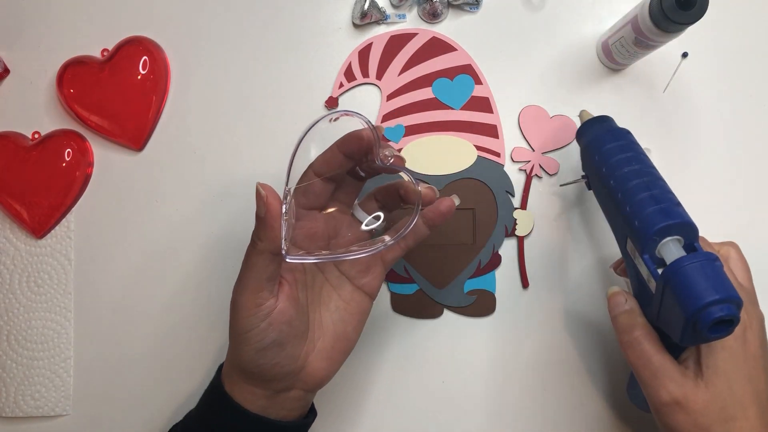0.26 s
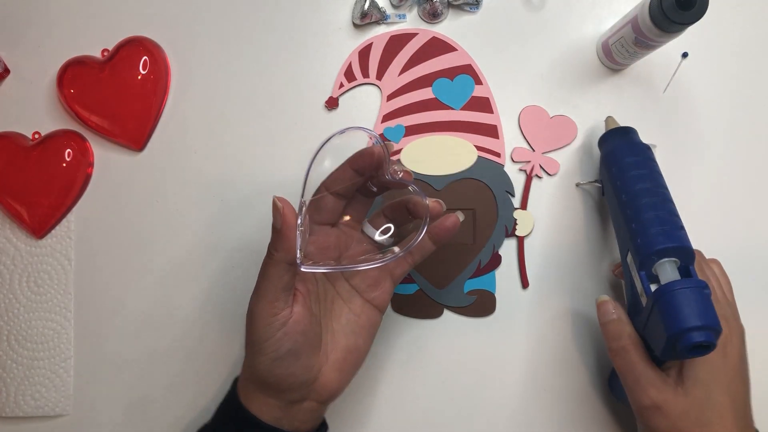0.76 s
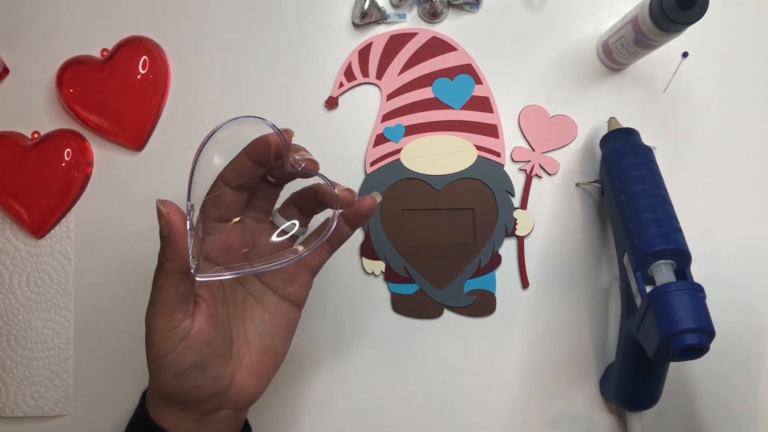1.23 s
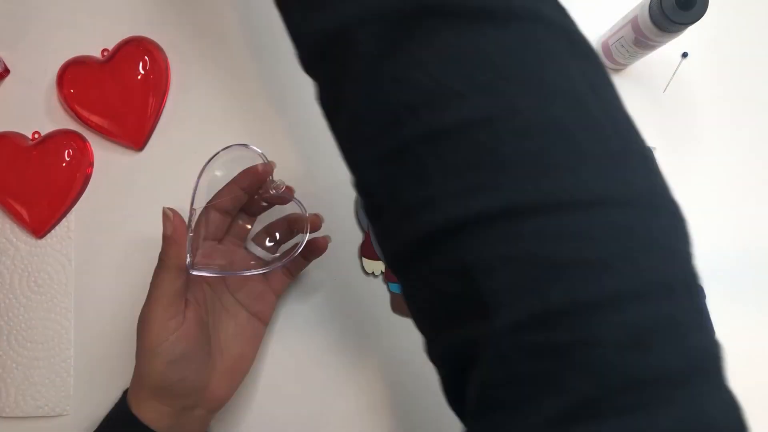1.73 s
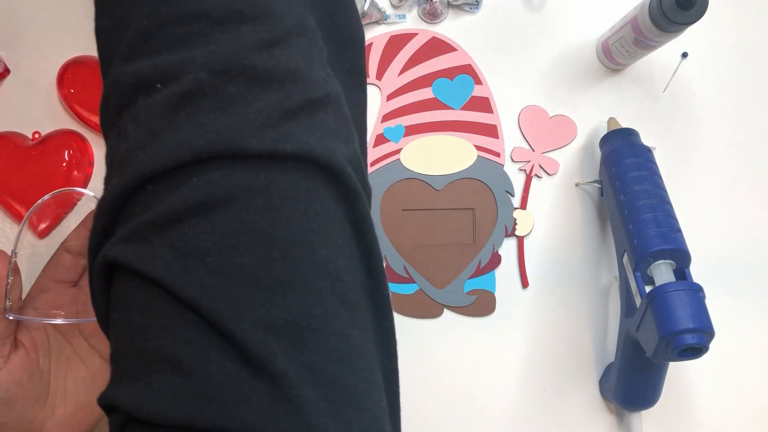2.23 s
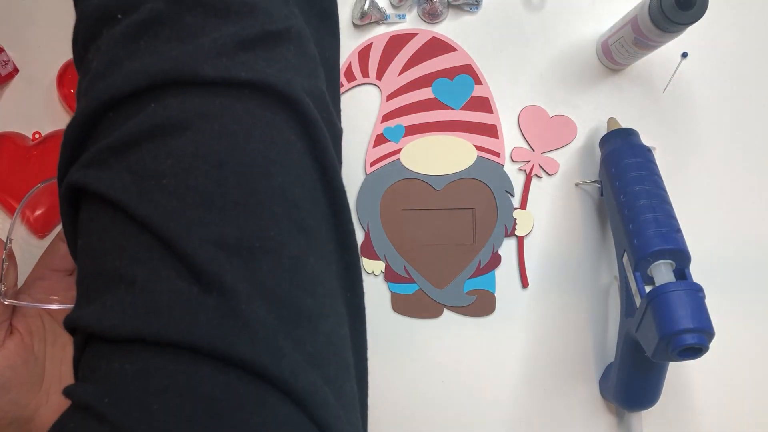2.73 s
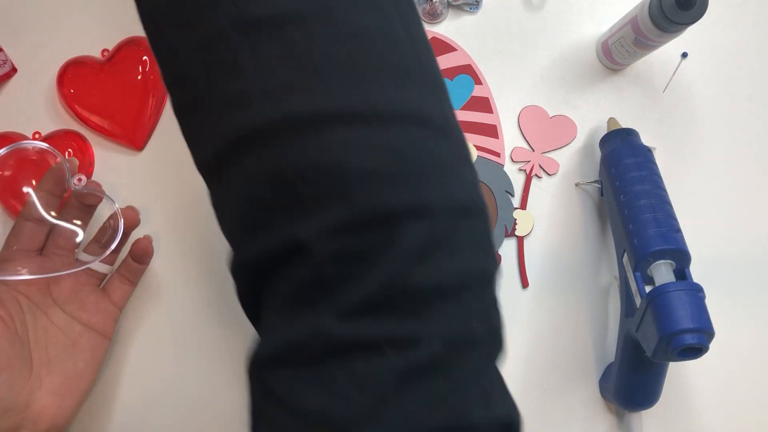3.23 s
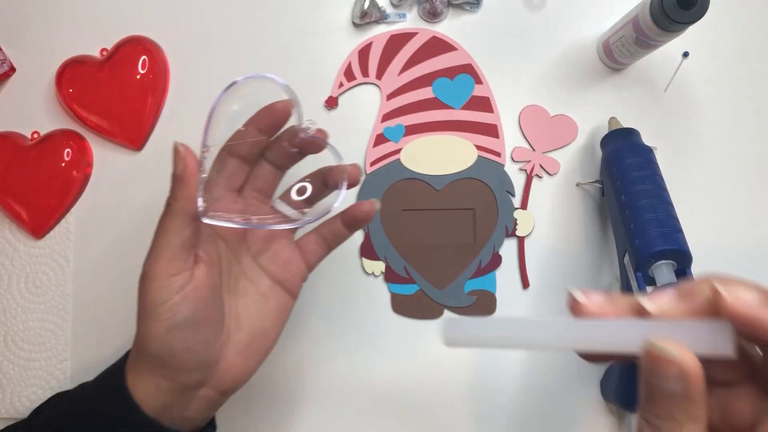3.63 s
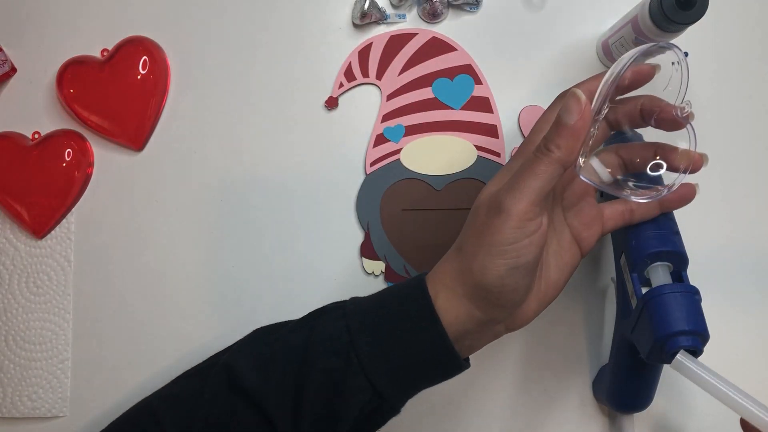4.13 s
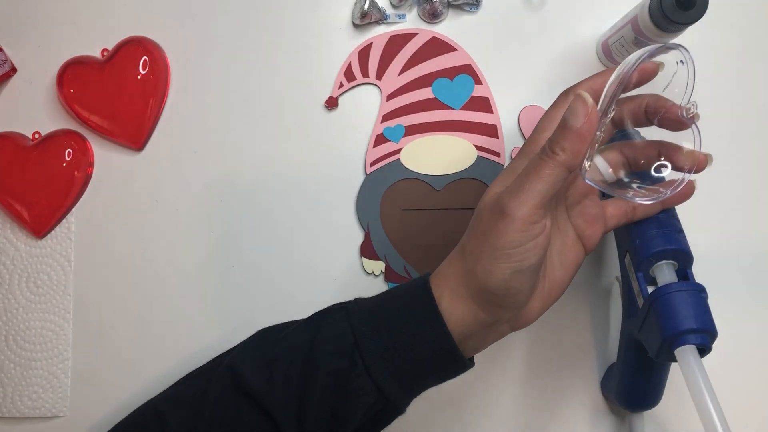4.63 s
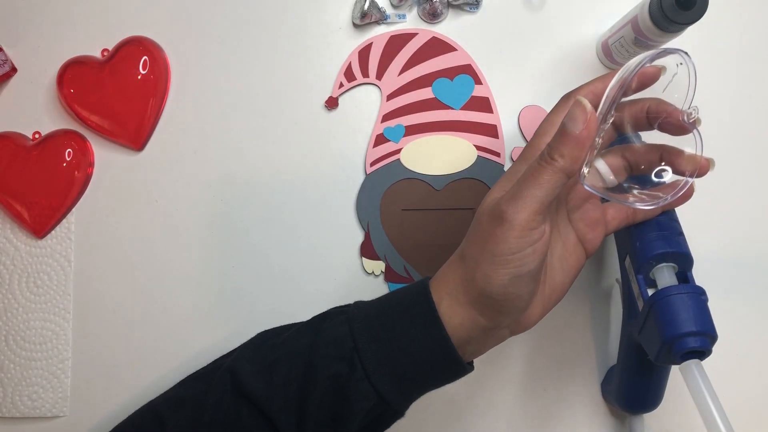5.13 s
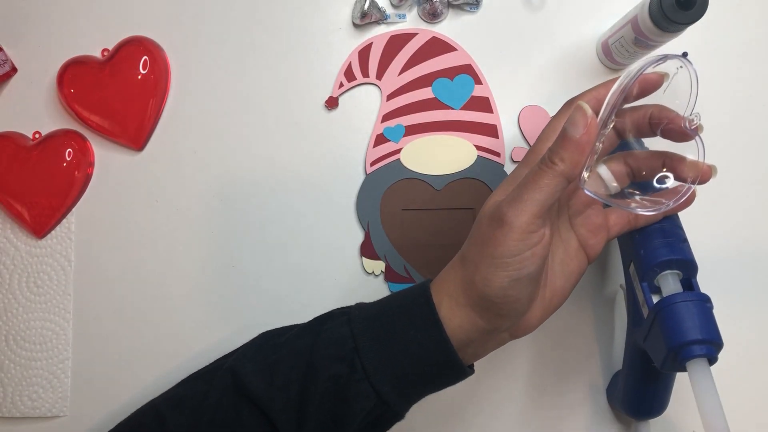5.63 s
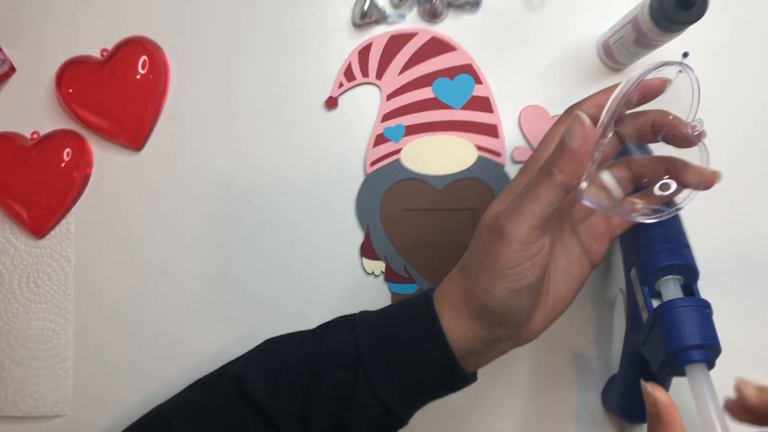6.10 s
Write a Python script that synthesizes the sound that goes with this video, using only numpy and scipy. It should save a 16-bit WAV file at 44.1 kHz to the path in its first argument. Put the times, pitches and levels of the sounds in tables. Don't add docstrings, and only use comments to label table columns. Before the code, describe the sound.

A small, fairly dry room with a soft phone microphone hiss and slight low rumble throughout. From 0.1 to 0.45 s a thin wire stand scrapes with a grainy metallic slide over a low table swell. Light scuffs at 0.75 s lead to the loudest event, a hard hollow plastic clack on the table at 0.83 s, with a quick rebound and a low thump. Small scuffs follow to 1.7 s, then a sleeve brushes by around 1.9 s. At 2.3 s a plastic bag snaps open, bright and crackly; light sticks rattle and fingers rummage until about 3.5 s, with cloth rustle. Soft dull nudges come from 4.1 s, with a firmer tap at 5.03 s. Dry latch clicks sound at 5.58 and 5.83 s. Two short woody knocks at 5.9 and 6.13 s rock the gun, table humming, and a tiny click ends it at 6.33 s.

```python
import sys
import numpy as np
from scipy import signal
from scipy.fft import rfft, irfft, next_fast_len
from scipy.io import wavfile
from scipy.ndimage import uniform_filter1d

SR = 44100
rng = np.random.default_rng(int(sys.argv[2]) if len(sys.argv) > 2 else 0)


def to_wav(sig):
    pcm = np.clip(np.atleast_2d(sig), -1, 1) * 32767
    pcm = np.round(pcm).astype(np.int16)
    wavfile.write(sys.argv[1], SR, pcm.T)


def undo_db(level):
    steps = np.asarray(level, float) / 20
    return 10 ** steps


N = 280577

# (frequency [Hz], level [dB], T60 [s])
TABLE = [(127.5, -6.5, 0.11), (172.4, 5, 0.04), (197.5, -5, 0.21), (235.8, 6, 0.065), (317, 6.5, 0.053)]
# (frequency [Hz], level [dB], T60 [s])
TICK = [(3454, 9, 0.0064), (4610, 0.5, 0.01), (5730, 8.5, 0.002), (7550, 3, 0.0019), (10100, -2, 0.0028),
        (12700, -11, 0.0024), (14800, -13, 0.0039)]
# (frequency [Hz], level [dB], T60 [s])
BASE = [(413, -4, 0.048), (471.5, -3, 0.073), (508, 5, 0.01), (657, -4.5, 0.043), (815, -5, 0.037)]


def evened(x):
    return x / np.sqrt(np.mean(x ** 2) + 1e-20)


def read(points, hz):
    f, value = np.transpose(points)
    return np.interp(np.log(hz + 1), np.log(f + 1), value)


def add(mix, start_s, sound):
    part = mix[round(start_s * SR):][:len(sound)]
    part += sound[:len(part)]


def noise(colour_db, patchy_db):
    real, imag, patches = rng.standard_normal((N // 128 + 5, 257, 3)).T
    patches = uniform_filter1d(patches, size=6, axis=0)
    patches = evened(uniform_filter1d(patches, size=14, axis=1))
    z = (real + 1j * imag) * undo_db(colour_db[:, None] + patchy_db * patches)
    return evened(signal.istft(z, nperseg=512, noverlap=384)[1][:N])


def swells(peak_s, db, fall_s):
    rise_share = 0.53
    grid = np.arange(0, N, 64)
    late = (grid / SR - peak_s[:, None]) / np.maximum(fall_s, .02)[:, None]
    level = undo_db(db[:, None] - 20 * np.maximum(late, -late / rise_share)).sum(0)
    return np.interp(np.arange(N), grid, level)


def ring(modes, chance, spread_db):
    hz, db, t60 = np.transpose(modes)[:, :, None]
    t = np.arange(round(min(t60.max(), .25) * SR)) / SR
    level, pitch = chance[:len(hz), None], chance[8:8 + len(hz), None]
    signs = (-1.) ** np.arange(len(hz))[:, None]
    decay = undo_db(db + spread_db * level - 60 * t / t60)
    return (signs * decay * np.sin(2 * np.pi * hz * (1 + .008 * pitch) * t)).sum(0)


def contacts(rows, bodies, stiff_db, slips_per_s, follow_db, dense_db):
    out, t = np.zeros(N), np.arange(round(.12 * SR)) / SR
    small = [signal.butter(3, .7 * modes[0][0], "high", fs=SR, output="sos") for modes in bodies]
    touch = [np.hanning(3 + int(SR / modes[-1][0] / 2)) for modes in bodies]
    for s, force_db, hard_db, thud_db, chatter_s in rows:
        levels_db = [force_db - hard_db, thud_db, force_db + stiff_db, force_db + hard_db]
        slips, sizes = rng.random(len(t)), rng.standard_normal(len(t))
        chance = rng.standard_normal((4, 16))
        fade_s = np.clip(chatter_s, .001, .05)
        force = (slips < slips_per_s / SR) * sizes * undo_db(follow_db) * np.exp(-t / fade_s)
        force[0] = 1
        force = force[:1 + int(8 * SR * fade_s)]
        for k, modes in enumerate(bodies):
            body = np.convolve(touch[k], ring(modes, chance[k], spread_db=1.17))
            n = len(body)
            dense = sizes[::-1][:n] * undo_db(-60 * t[:n] * modes[0][0] / 25)
            dense = np.convolve(np.convolve(touch[k], touch[k]), dense)[:n]
            dense = signal.sosfilt(small[k], dense)
            body[:len(dense)] += dense / abs(dense).max() * abs(body).max() * undo_db(dense_db)
            sound = signal.sosfilt(small[k], signal.fftconvolve(force, body))
            add(out, s, undo_db(levels_db[k] + 2.0) * sound / abs(sound).max())
    return out


def microphone_noise():
    # (frequency [Hz], level [dB per Hz])
    hiss_colour = [(25, -5), (55, -3), (146, -4), (210, -12.5), (301, -7), (542, -17), (2200, -27.5),
                   (16000, -39)]
    # (first [s], period [s], length [s], frequency [Hz], level [dB])
    whistle = (.02, 1.277, .04, 14000, -82)
    hz = np.fft.rfftfreq(2048, 1 / SR)
    real, imag = rng.standard_normal((N // 512 + 5, len(hz), 2)).T
    z = (real + 1j * imag) * undo_db(read(hiss_colour, hz))[:, None]
    hiss = signal.istft(z, nperseg=2048, noverlap=1536)[1][:N]
    first_s, period_s, length_s, chirp_hz, chirp_db = whistle
    t = np.arange(N) / SR - first_s
    swell = np.sin(np.pi * np.clip(t % period_s / length_s, 0, 1))
    chirp = swell * np.sin(2 * np.pi * chirp_hz * t) * (t > 0)
    return undo_db(-70) * evened(hiss) + undo_db(chirp_db) * chirp


def room(x):
    # (frequency [Hz], T60 [s])
    decay = [(100, 0.8), (260, 0.29), (700, 0.21), (1840, 0.26), (4850, 0.18), (12000, 0.13)]
    hz, t, z = signal.stft(rng.standard_normal(SR // 2), SR, nperseg=256)
    tail = signal.istft(z * undo_db(-60 * t / read(decay, hz)[:, None]), SR, nperseg=256)[1]
    tail *= np.clip(np.arange(len(tail)) / SR / 0.018, 0, 1)
    return signal.oaconvolve(x, tail / np.linalg.norm(tail))[:N]


def stand():
    # (frequency [Hz], width [Hz], level [dB])
    wires = [(836, 170, 1), (1516, 130, 2), (1860, 62, -4.5), (2480, 180, 3), (4360, 220, -3),
             (15000, 720, -4)]
    # (time [s], level [dB])
    drag = [
        (.03, -82),
        (0.119, -71.5),
        (.25, -60),
        (.33, -66),
        (.45, -77.5),
        (.62, -80),
    ]
    slips = rng.standard_normal(N) * (rng.random(N) < 2500 / SR)
    modes = [(hz, db, 2.2 / width_hz) for hz, width_hz, db in wires]
    sound = evened(signal.oaconvolve(slips, ring(modes, np.zeros(16), 0))[:N])
    return sound * undo_db(np.interp(np.arange(N) / SR, *np.transpose(drag), left=-150, right=-150))


def rubbing():
    # (frequency [Hz], level [dB per Hz])
    cloth = [(180, -43), (300, -3), (372, 1), (674, -4), (953, 0.5), (1140, -5), (15500, -6)]
    # (time [s], level [dB])
    sleeve_track = [(0, -79.5), (.56, -80.5), (.85, -79), (1.3, -81), (1.68, -73), (1.88, -66.5),
                    (2.23, -76.5), (2.36, -64), (2.48, -81), (2.85, -82.5), (3.0, -65.5), (3.24, -75.5),
                    (3.61, -74.5), (3.95, -80), (6.36, -82.5)]
    # (time [s], level [dB], brightness [dB], 20 dB fall [s])
    strokes = [(.13, -62.5, -15, 0.24), (.26, -77.5, 9.5, 0.32), (.44, -74, -40, 0.5),
               (0.801, -69, 3, 0.15), (0.921, -55.5, -19, 0.09), (1.79, -84, -10, 0),
               (2.06, -72.5, 3, 1.22), (2.37, -73, 5, 0.32), (2.52, -62.5, -12.5, 0.17),
               (2.644, -55, -36.5, -0.09), (2.93, -65.5, -16.5, 0.07), (3.07, -64, 0.5, 0.24),
               (3.6, -70, -3, 0.75), (4.22, -78.5, -13, 0.5), (4.84, -66.5, -17, 0.13),
               (5.53, -64, -10.5, 0.43), (5.72, -67, -28, 0), (5.92, -75, -11, -0.7),
               (6.35, -73, -2.5, 0.7)]
    # (time [s], level [dB], 20 dB fall [s])
    hums = [(.81, -71.5, 1.27), (1.68, -81, -0.6), (2.05, -79, 2), (3.06, -63, -0.5), (3.61, -71.5, 0.5),
            (4.22, -75, 0.95), (4.57, -78.5, 0.5), (4.962, -65, 0.14), (5.6, -80, 1), (5.74, -63.5, 0),
            (5.92, -57.5, 0.27), (6.16, -49, -0.3)]
    hz = np.fft.rfftfreq(512, 1 / SR)
    s, db, bright_db, fall_s = np.transpose(strokes)
    sleeve = undo_db(np.interp(np.arange(N) / SR, *np.transpose(sleeve_track)))
    low = swells(s, db, fall_s)
    mid = swells(s, db + bright_db, fall_s) + undo_db(-12) * sleeve
    out = np.zeros(N)
    for level, lo_hz, hi_hz in [(low, 300, 670), (mid, 1100, 4170), (sleeve, 4000, 37000)]:
        slopes_db = -10 * np.log10(1 + (lo_hz / (hz + 1)) ** 4) - 10 * np.log10(1 + (hz / hi_hz) ** 4)
        grain = undo_db(1.0 * evened(uniform_filter1d(rng.standard_normal(N), size=200)))
        out += level * evened(grain * noise(read(cloth, hz) + slopes_db, patchy_db=1.9))
    hum_modes = [(220.0, 12.7, 0.48), (169, 21.3, 0.056), (275.5, 18, 0.069)]  # (Hz, dB, T60 s)
    hum = signal.oaconvolve(rng.standard_normal(N), ring(hum_modes, np.zeros(16), 0))
    return out + swells(*np.transpose(hums)) * evened(hum[:N])


def thumps():
    # (time [s], level [dB], frequency [Hz], T60 [s], swell [cycles])
    shakes = [
        (.229, -50.5, 216.4, 0.3, 0.98),
        (.332, -41, 212, 0.29, 5.1),
        (0.836, -47, 71, 0.4, 0.99),
        (.98, -50.5, 205.5, 0.28, 4),
        (1.226, -42, 197, 0.24, 0.99),
        (3.719, -56, 65, 0.31, 0.99),
        (5.898, -56, 71, 0.39, 1.1),
        (6.13, -50.5, 70.3, 0.39, 1),
    ]
    out, t = np.zeros(N), np.arange(round(.4 * SR)) / SR
    for s, db, hz, t60, cycles in shakes:
        swell = 1 - np.exp(-t * hz / max(cycles, .3))
        add(out, s, undo_db(db - 60 * t / t60) * swell * np.sin(2 * np.pi * hz * t))
    return out


def bending(x):
    bend_s = 0.00398
    size = next_fast_len(N + SR // 4)
    hz = np.fft.rfftfreq(size, 1 / SR)
    lag_s = bend_s * np.maximum(np.sqrt(500 / np.maximum(hz, 100)) - .3, 0)
    phase = 2 * np.pi * np.cumsum(lag_s) * SR / size
    return irfft(rfft(x, size) * np.exp(-1j * phase), size)[:N]


def bag_of_sticks():
    # (time [s], force [dB], hardness [dB], table thud [dB], chatter [s])
    snap = [(2.303, -37.5, 4, -62, 0.002), (2.305, -31, 1, -57.5, 0.0046), (2.315, -36.5, 0.5, -84, 0.0069),
            (2.327, -50, 8.5, -58, 0.008), (2.345, -45.5, 2, -53, 0.02), (2.351, -65, -7, -63, 0.018),
            (2.383, -50.5, -3, -64, 0.017), (2.423, -52, -1, -57, 0.0084), (2.477, -53, 0, -76, 0.004),
            (2.483, -65, 16, -83, 0.0042), (2.505, -52, 3, -57.5, 0.0036), (2.555, -46.5, 2.5, -58, 0.012),
            (2.568, -55, 8, -55.5, 0.0052), (2.58, -49, 5, -56, 0.0061), (2.642, -57, -5.5, -77, 0.002),
            (2.679, -66, -2, -70, 0.0069)]
    search = [(2.763, -59.5, -5, -104, 0.012), (2.793, -65.5, 0, -66, 0.021), (2.82, -59.5, 3, -69, 0.0065),
              (2.89, -57.5, 1.5, -68, 0.016), (2.922, -57, 1, -56, 0.01), (2.949, -51.5, 2, -71, 0.011),
              (3.011, -47, 2.5, -59, 0.004), (3.018, -61.5, -14, -70, 0.0023),
              (3.032, -57, -14, -56.5, 0.003), (3.04, -58.5, -11, -74, 0.0071),
              (3.062, -62, -8, -61, 0.004), (3.067, -60, -9, -76, 0.0045), (3.084, -55.5, 19, -75, 0.0014),
              (3.088, -51, 12.5, -73, 0.0036), (3.148, -54.5, 2, -73, 0.0054), (3.21, -60, 4, -71, 0.0039),
              (3.311, -58.5, 0.5, -66, 0.0022), (3.47, -60.5, 5, -63, 0.02),
              (3.491, -61.5, -2, -55.5, 0.034), (3.523, -59.5, 3, -63, 0.0033), ]
    # (frequency [Hz], level [dB], T60 [s])
    sticks_low = [(725, -3, 0.019), (995, 1, 0.015), (1156, 4, 0.0047)]
    sticks_mid = [(1190, 2, 0.01), (1660, 4.5, 0.0096), (1994, 5.5, 0.013), (2550, 9.5, 0.007),
                  (2790, -22, 0.0037)]
    film = [(3190, 8.5, 0.005), (4240, 14.8, 0.0023), (5960, 14.1, 0.0017), (6670, 1.5, 0.0097),
            (7780, 4.8, 0.0046), (9540, 3.8, 0.005), (12000, 12, 0.0019), (15300, 2, 0.0038)]
    bodies = [sticks_low, TABLE, sticks_mid, film]
    opening = contacts(snap, bodies, stiff_db=4, slips_per_s=2900, follow_db=-6.5, dense_db=-14)
    return opening + contacts(search, bodies, stiff_db=-0.5, slips_per_s=1500, follow_db=-4.5, dense_db=-9)


def stick_nudges():
    # (time [s], force [dB], hardness [dB], table thud [dB], chatter [s])
    nudges = [(4.114, -67.5, -9, -58, 0.039), (4.142, -64, -4, -55.5, 0.017),
              (4.182, -60, -7, -48.5, 0.0052), (4.197, -59.5, -4.5, -71, 0.0069),
              (4.4, -79, -19, -54, 0.0039), (4.413, -73.5, -14, -61, 0.008), (4.437, -72, 0, -57.5, 0.0047),
              (4.496, -64, 1, -57.5, 0.011), (4.535, -67.5, -15.5, -55, 0.0045),
              (4.801, -57, -2, -55.5, 0.013), (4.968, -53, -5.5, -67, 0.0015),
              (5.026, -41, -7, -45.5, 0.0042), (5.035, -55.5, -3, -55, 0.004),
              (5.054, -70, -0.5, -52.5, 0.01), (5.265, -56.5, -8, -46, 0.0025),
              (5.299, -81, 1, -56, 0.0075), (5.365, -57.5, -0.5, -58, 0.014)]
    # (frequency [Hz], level [dB], T60 [s])
    tube = [(428, 1, 0.027), (679, -1, 0.084), (918, -0.5, 0.021), (1166, 0, 0.013)]
    stick = [(1350, 1.5, 0.0058), (1493, -1.5, 0.027), (1740, -2, 0.029), (1920, -2.5, 0.01),
             (2540, -6, 0.014)]
    return contacts(nudges, [tube, TABLE, stick, TICK], stiff_db=-0.5, slips_per_s=1800,
                    follow_db=-12, dense_db=-9)


def stick_feeds():
    # (time [s], force [dB], hardness [dB], table thud [dB], chatter [s])
    clicks = [(5.552, -70, -12, -54, 0.0023), (5.579, -49, 5, -70, 0.0048), (5.584, -43.5, 7, -47, 0.0028),
              (5.598, -52.5, -0.5, -63, 0.0045), (5.62, -63, -9, -48.5, 0.026), (5.796, -83, 1, -57, 0.014),
              (5.813, -65.5, -14.5, -71, 0.0072), (5.828, -42.5, 1, -68, 0.011),
              (5.84, -43.5, 3.5, -67, 0.0078), (5.847, -49, 11, -48, 0.0038),
              (5.861, -45, 3, -43.5, 0.0066), (6.332, -50.5, 5.5, -85, 0.0054),
              (6.341, -60, 6, -60, 0.0077)]
    # (frequency [Hz], level [dB], T60 [s])
    feeder = [(1170, -6, 0.0061), (1682, -2.5, 0.018), (1830, -0.5, 0.011), (2234, -3, 0.0073),
              (2740, -3.5, 0.013)]
    latch = [(3440, -1.5, 0.011), (4480, -9, 0.0091), (4860, -10, 0.0066), (6140, -5.5, 0.0035),
             (8060, -11, 0.0095), (11000, -11, 0.0032), (13800, -11, .003)]
    return contacts(clicks, [BASE, TABLE, feeder, latch], stiff_db=7.5, slips_per_s=2000,
                    follow_db=-6, dense_db=-15)


def gun_rocks():
    # (time [s], force [dB], hardness [dB], table thud [dB], chatter [s])
    rocks = [
        (5.898, -37, -4, -41.5, 0.0015),
        (5.989, -59, -5.5, -59, 0.004),
        (6.028, -66.5, -11, -68, 0.002),
        (6.095, -65, -3, -49, 0.0056),
        (6.125, -36, -9.5, -40, 0.0013),
        (6.137, -40, -6.5, -60, 0.001),
        (6.146, -47.5, -11, -64, 0.0026),
        (6.207, -66, -10, -64, 0.0026),
    ]
    # (frequency [Hz], level [dB], T60 [s])
    loaded = [(1360, 0, 0.029), (1477, 1, 0.022), (1930, -3.5, 0.022), (2520, -3, 0.016)]
    return contacts(rocks, [BASE, TABLE, loaded, TICK], stiff_db=-8, slips_per_s=3500,
                    follow_db=-19.5, dense_db=-14)


def gun_set_down():
    # (time [s], force [dB], hardness [dB], table thud [dB], chatter [s])
    blows = [
        (0.173, -58, 2, -83, 0.0041),
        (0.231, -65.5, 14, -54, 0.0059),
        (0.346, -62.5, 1, -82, 0.0065),
        (0.609, -90, 8, -60, 0.0064),
        (0.832, -24, -5, -51, 0.0025),
        (0.848, -51.5, -7, -41.5, 0.0052),
        (1.767, -65, -2, -52.5, 0.004),
        (1.8, -59, 3, -61, 0.0037),
    ]
    scuffs = [(0.135, -67, -13, -57.5, 0.0063), (0.743, -53, -11.5, -41.5, 0.005),
              (0.758, -58, 9, -42, 0.017), (0.768, -57, -13, -50, 0.0037),
              (0.776, -55.5, -16.5, -60, 0.0028), (0.791, -61, -1, -43, 0.02), (0.81, -55, -9, -45, 0.014),
              (0.968, -59.5, -2, -52.5, 0.033), (0.989, -72, -1, -75, 0.024),
              (1.227, -52, -5.5, -42.5, 0.013), (1.247, -60, -1, -49, 0.041), (1.285, -62, 3.5, -57, 0.02),
              (1.412, -68, 2, -64, 0.027), (1.686, -52.5, -2, -46.5, 0.022), (1.891, -64, 10, -68, 0.022),
              (5.496, -69, -9, -60, 0.058), (5.53, -60.5, -7, -67, 0.016)]
    # (frequency [Hz], level [dB], T60 [s])
    shell = [(368, -4.5, 0.054), (460, -7.5, 0.081), (531.5, -7, 0.11), (500, 6.5, 0.011),
             (629, -16.5, 0.19), (750, 4.5, 0.0086), (816, 4, 0.028)]
    stiff = [(1083, 1, 0.012), (1410, -1, 0.01), (1780, 2, 0.007), (2390, -8.5, 0.031), (2845, -4.5, 0.011)]
    bodies = [shell, TABLE, stiff, TICK]
    landing = contacts(blows, bodies, stiff_db=-2.5, slips_per_s=310, follow_db=-3, dense_db=-12)
    return landing + contacts(scuffs, bodies, stiff_db=5.5, slips_per_s=5000, follow_db=-8.5, dense_db=-10.5)


def scene():
    near = bending(gun_set_down() + gun_rocks() + stick_nudges()) + stick_feeds()
    bag = bag_of_sticks()
    wet = room(undo_db(-13.0) * near + undo_db(-12.0) * bag)
    blows = near + bag + wet + thumps()
    over = undo_db(-14)
    rest = (1 - over) * blows + rubbing() + stand() + microphone_noise()
    return (over * blows + signal.oaconvolve(rest, signal.firwin(401, 15800, fs=SR), "same"))[None]


def top_cut(x):
    return signal.sosfilt(signal.butter(12, 16510, fs=SR, output="sos"), x)


def record(dry):
    thin = signal.sosfilt(signal.butter(4, 40, "high", fs=SR, output="sos"), dry)
    return top_cut(thin)


dry = scene()
out = record(dry)
to_wav(out)
```